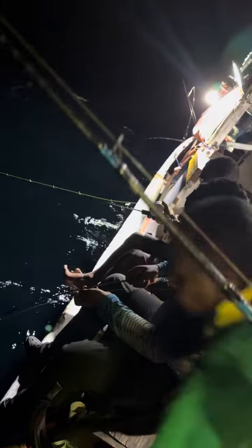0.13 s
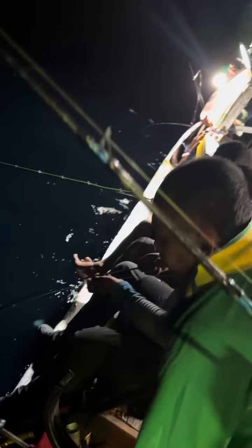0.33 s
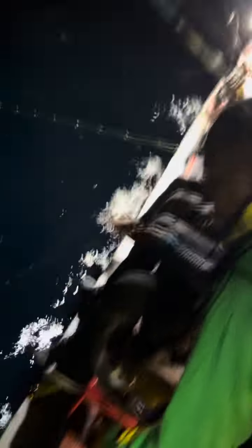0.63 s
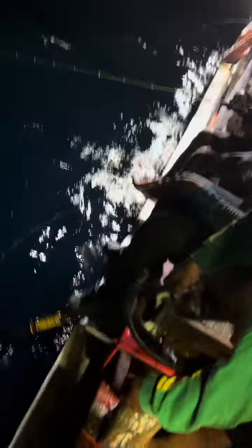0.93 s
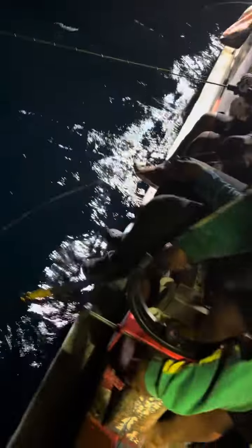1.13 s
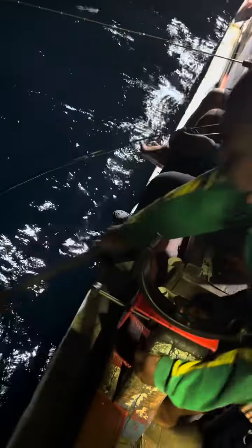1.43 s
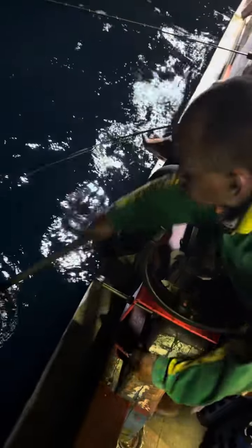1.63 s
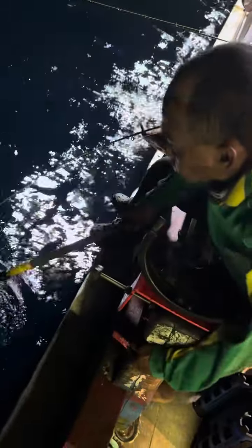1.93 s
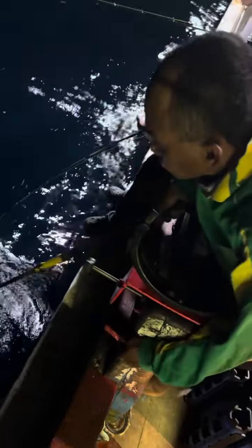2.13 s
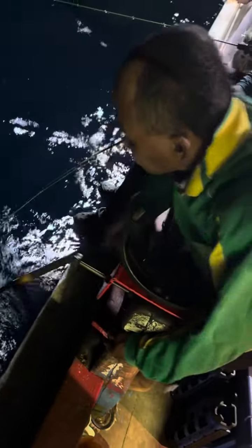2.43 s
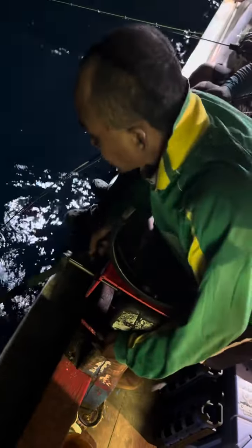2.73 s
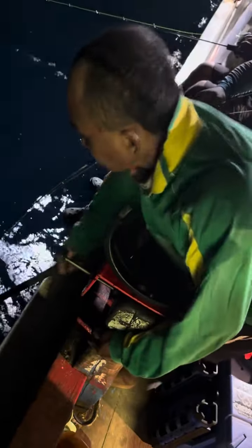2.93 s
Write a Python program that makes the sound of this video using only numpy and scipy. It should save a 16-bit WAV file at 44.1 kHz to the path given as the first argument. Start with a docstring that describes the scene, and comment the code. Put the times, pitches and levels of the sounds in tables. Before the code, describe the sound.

A small boat engine drones low and steadily outdoors on the water, with a slower putting engine beneath. Wind bumps the microphone early, a dull hull thump lands, then faint reel ticks and small gear knocks follow.

```python
"""Small boat idling in a breeze

A small boat's engine hums in shaft orders (tones at multiples of the shaft speed) over noise shaped into
rumble, body sound and hiss. Random crackles make spray, and a slower second engine putts through its pipe.
Breeze gusts push a stereo microphone's two ports in opposite directions. Damped tones thump the hull,
noise snaps make a reel ratchet tick, and short noise bursts make gear scrape and knock.
"""
import sys
import numpy as np
from scipy import signal
from scipy.fft import rfft, irfft, next_fast_len
from scipy.io import wavfile
from scipy.ndimage import uniform_filter1d, map_coordinates

SR = 44100
rng = np.random.default_rng(int(sys.argv[2]) if len(sys.argv) > 2 else 0)


def boost(x):
    """Linear amplitude factor 10**(x/20) for a level x in decibels (scalar or array-like)."""
    u = np.asarray(x, float) / 20
    return 10 ** u


def transcribe(u):
    """Save the signal u as a 16-bit wav file named by the first command-line argument.

    u: samples, shape (n,) or (channels, n), limited to [-1, 1]; the rate is SR.
    q: integer samples, one column per channel.
    """
    v = np.clip(np.atleast_2d(u).T, -1, 1)
    q = np.round(v * 32767).astype(np.int16)
    wavfile.write(sys.argv[1], SR, q)


N = 136710  # length in samples

# Shaft speed over time: time_s, turns_hz
SHAFT_SPEED = [(0, 18.58), (1.3, 18.59), (1.6, 18.65), (2.1, 18.67), (2.8, 18.67), (3.1, 18.65)]
# Strength of each shaft order, relative to the others (the fifth takes its level from
# FIFTH_ORDER_LEVEL): multiple_of_shaft_speed, level_db
SHAFT_ORDERS = [(5, -3), (6, -11.5), (7, 1), (8, -12), (9, -24.5), (10, -16.5), (11, -18), (12, -12),
                (13, -14), (14, -15), (15, -27.5), (17, -24.5), (18, -17), (19, -24.5), (20, -33.5),
                (21, -23.5), (22, -26.5), (23, -33), (24, -29.5), (27, -36.5), (28, -39.5), (29, -30),
                (31, -35), (33, -34), (34, -28.5), (35, -30), (37, -32.5), (38, -40), (39, -32.5),
                (44, -32), (59, -43), (61, -43.5), (62, -37), (63, -40.5), (66, -38.5), (67, -36.5),
                (73, -35.5), (75, -36.5)]
# Level of the tone near 93 Hz, which swells and sinks as two engines' close tones beat;
# the curve stands in for the beating: time_s, level_db
FIFTH_ORDER_LEVEL = [(0, -30), (.25, -20.5), (.45, -33), (.62, -22), (.9, -19.5), (1.2, -23), (1.4, -32),
                     (1.6, -34), (1.8, -26), (2.1, -18), (2.4, -26), (2.6, -26), (2.8, -25), (3.1, -33)]
# Colour of the exhaust rumble: pitch_hz, level_db (per Hz)
RUMBLE_COLOUR = [(20, -36.5), (32, -13), (50, 3), (58, 0), (67, 3), (78, 2), (95, -4.5), (120, -2),
                 (150, -6.5), (170, -10.5), (250, -22.5), (400, -24), (600, -70)]
# Rise and fall of the rumble, before a fixed trim: time_s, level_db
RUMBLE_LEVEL = [(0, -20.5), (.12, -22), (.22, -20.5), (.38, -27.5), (.46, -19), (.55, -21.5), (.7, -34),
                (1.05, -22.5), (1.2, -27), (1.35, -23), (1.7, -24.5), (1.95, -22), (2.1, -26), (2.25, -22),
                (2.36, -27), (2.45, -19.5), (2.55, -22.5), (2.9, -26.5), (3.1, -25)]
# Colour of the engine body noise: pitch_hz, level_db (per Hz)
BODY_COLOUR = [(100, -25), (200, 0.5), (400, -5.5), (550, -7), (900, -11.5), (1350, -15), (1600, -19),
               (2600, -20), (3200, -26.5), (5000, -34.5), (7000, -70)]
# Rise and fall of the body noise, before a fixed trim: time_s, level_db
BODY_LEVEL = [(0.0, -35), (0.47, -37), (0.82, -36.5), (1.4, -36.5), (1.93, -35), (2.09, -37), (2.68, -36.5),
              (3.1, -36.5)]
# Colour of the engine and water hiss: pitch_hz, level_db (per Hz)
HISS_COLOUR = [(2000, -15), (3500, 1.5), (5000, -4), (6200, 0.5), (7500, -1), (9500, -1.5), (11000, -10),
               (13000, -2.5), (15500, -8), (15850, -14.5), (15900, -84)]
# Rise and fall of the hiss, before a fixed trim; spray follows it too: time_s, level_db
HISS_LEVEL = [(0, -47.5), (.6, -47.5), (.9, -48), (1.15, -48), (1.25, -44), (1.36, -46.5), (1.58, -47),
              (1.71, -45), (1.8, -45.5), (1.9, -42.5), (2.03, -44.5), (2.1, -46.5), (2.3, -46.5),
              (2.5, -47.5), (3.1, -46.5)]
# Likeness of left and right, apart from their phase: pitch_hz, likeness (1 = the same)
STEREO_LIKENESS = [(60, .998), (380, .99), (560, .6), (1050, .62), (1500, .9), (1950, .995), (2300, .9),
                   (2900, .5), (4800, .45), (5700, .93), (8500, .76), (10000, .88), (10500, .999),
                   (13600, .999), (14200, .97), (15500, .9)]
# Phase lead of left over right; from 10.4 to 13.6 kHz the two are opposite: pitch_hz, lead_rad
STEREO_PHASE = [(0, 0), (300, 0), (600, -.25), (1100, .45), (1700, 0), (2200, 0), (2900, .8), (4200, -.45),
                (5000, .1), (5700, -.2), (7500, -1.4), (9500, -2.2), (10400, -np.pi), (13600, -np.pi),
                (14300, -3.6), (15500, -4)]
# Level of the whirr: time_s, level_db
WHIRR_LEVEL = [(0, -42), (.3, -40), (.6, -50.5), (1.5, -56), (3.1, -52.5)]
# Resonances of the reel's body: pitch_hz, width_hz, level_db
REEL_BODY = [(4770, 2400, -2.5), (5830, 1600, 4.5), (6770, 900, 4), (9330, 2000, -3)]
# Breeze gusts on the ports: start_s, length_s, level_db
GUSTS = [(0.034, 0.081, -22), (0.123, .1, -18), (0.251, 0.077, -23.5), (.34, 0.26, -29),
         (0.639, 0.056, -22.5), (.72, 0.13, -27), (0.831, 0.093, -24), (0.947, 0.057, -27.5),
         (1.014, 0.049, -21.5), (1.088, 0.193, -36), (1.423, .1, -39), (2.15, 0.17, -47.5),
         (2.424, 0.097, -43), (3.03, .07, -40)]
# Colour of the breeze: pitch_hz, level_db (per Hz)
BREEZE_COLOUR = [(20, -22), (50, 2), (120, 2), (200, 2), (400, -6.5), (800, -24), (1500, -55)]
# Resonances of the second engine's exhaust pipe: pitch_hz, width_hz, level_db
EXHAUST_PIPE = [(50, 12, -3), (68, 8, 0), (98, 14, -2)]
# Dull thumps on the hull: start_s, level_db (before the soft start), pitch_hz, fade_60db_s
HULL_THUMPS = [(.564, -11, 160, 0.045), (.568, -10.5, 352, 0.045), (.570, -14, 435, .035),
               (.572, -15, 600, 0.03), (.574, -11, 250, 0.04), (.586, -13, 210, .04),
               (.582, -9.5, 328, .045), (.583, -13, 480, .035), (.5955, 3, 95, .04), (.614, -17, 330, .04),
               (.895, -20, 360, .04), (1.043, -18, 400, .035)]
# Ratchet ticks: start_s, level_db
RATCHET_TICKS = [(.940, -31.5), (.955, -34.5), (.978, -33.5), (1.009, -34), (1.038, -36.5), (1.052, -39.5),
                 (1.102, -36), (1.127, -35), (1.155, -33.5), (1.178, -38.5), (1.191, -38), (1.211, -33),
                 (1.236, -33.5), (1.245, -33.5), (1.256, -35), (1.270, -33.5), (1.291, -35.5), (1.331, -33),
                 (1.391, -32.5), (1.423, -34), (1.449, -35), (1.520, -35), (1.5989, -28), (1.819, -38),
                 (1.849, -39.5), (1.886, -34), (1.948, -35.5), (1.99, -35), (2.003, -32), (2.026, -35),
                 (2.075, -35), (2.083, -35), (2.19, -35), (2.216, -35), (2.245, -36), (2.28, -35),
                 (2.41, -37), (2.542, -37), (2.646, -36), (2.962, -35), (3.018, -36), (3.078, -34)]
# Scrapes and knocks of gear: start_s, length_s (before fading), level_db, pitch_hz, width_hz
GEAR_KNOCKS = [(1.52, 0.014, -38.5, 3000, 1500), (1.745, 0.012, -30, 1150, 500),
               (1.751, .01, -33, 2100, 900), (1.753, 0.011, -24, 904, 110),
               (1.815, 0.0061, -35, 2600, 1530), (1.888, 0.019, -31.5, 1010, 490),
               (1.893, .006, -31, 2150, 400), (1.894, .005, -31, 2750, 500), (1.904, .007, -32, 2150, 300),
               (1.903, 0.008, -30, 2710, 250), (1.907, 0.004, -34.5, 4800, 1800),
               (1.971, 0.0084, -35.5, 2850, 900), (1.993, 0.0058, -27.5, 900, 890),
               (1.924, 0.056, -39, 1500, 1200), (2.004, 0.012, -35, 2000, 900),
               (2.014, .014, -35, 2600, 500), (2.192, 0.0044, -34, 12900, 7000)]

# The slower second engine, which also sets the rhythm of the rumble
PUTTS_PER_S, PUTT_START_S = 8.56, .074


def unit(x):
    """Scale to an average (rms) level of 1."""
    return x / np.sqrt(np.mean(x ** 2) + 1e-20)


def along(points, hz):
    """Read a pitch table between its points, on a log pitch axis."""
    table_hz, value = np.transpose(points)
    return np.interp(np.log(hz + 1), np.log(table_hz + 1), value)


def curve(rows):
    """Read a time table between its points, one value per sample."""
    return np.interp(np.arange(N) / SR, *np.transpose(rows))


def wobble(rate):
    """A smooth random curve through `rate` random points a second."""
    points = rng.standard_normal(int(N * rate / SR) + 4)
    return map_coordinates(points, [np.arange(N) * rate / SR])


def filtered(x, response):
    """Multiply the spectrum of x by a response that depends on pitch."""
    m = next_fast_len(x.shape[-1] + 8192)
    spectrum = rfft(x, m) * response(np.fft.rfftfreq(m, 1 / SR))
    return irfft(spectrum, m)[..., :x.shape[-1]]


def resonant(x, peaks):
    """Ring x in a set of resonances, added with alternating signs."""
    def response(f):
        total = 0
        for k, (centre, width, db) in enumerate(peaks):
            ring = 1j * f * width / (centre * centre - f * f + 1j * f * width)
            total = total + (-1) ** k * boost(db) * ring
        return total
    return filtered(x, response)


def noise(colour, patchy_db):
    """Two unrelated coloured noises that share patches of random gain in time and pitch."""
    z = signal.stft(rng.standard_normal((2, N)), nperseg=512)[2]
    patches = rng.standard_normal(z.shape[1:])
    for axis in (0, 1):
        patches = uniform_filter1d(patches, size=8, axis=axis)
    pair = signal.istft(z * boost(patchy_db * unit(patches)), nperseg=512)[1][:, :N]
    return unit(filtered(pair, lambda hz: boost(along(colour, hz))))


def place(out, sound, start_s):
    """Add a short sound to a longer one at its start time."""
    i = round(start_s * SR)
    out[..., i:i + sound.shape[-1]] += sound


def ports(pair):
    """A direct and a scattered sound mix into left and right, partly alike and out of phase."""
    def share(hz):
        # this angle makes a + b and a - b as alike as the table says
        angle = np.arccos(np.clip(along(STEREO_LIKENESS, hz), 0, 1)) / 2
        return np.array([np.cos(angle), np.sin(angle)])
    a, b = filtered(pair, share)
    # half of the phase lead goes to each side
    lead = lambda hz: np.exp(.5j * np.outer([1, -1], along(STEREO_PHASE, hz)))
    return filtered(np.array([a + b, a - b]), lead)


def shaft_hum(turn):
    """Each shaft order is a slightly unsteady tone at a multiple of the shaft's turning."""
    strongest_db = -20.8
    sweep_rad, sweep_order = .5, 13.8  # phase bend per order squared; order with no delay
    shared_waver_rad, own_waver_rad = .02, .15
    top = max(db for _, db in SHAFT_ORDERS)
    hum, waver = np.zeros((2, N)), shared_waver_rad * wobble(4)
    for k, db in SHAFT_ORDERS:
        level_db = curve(FIFTH_ORDER_LEVEL) if round(k) == 5 else strongest_db + db - top
        unsteady_db = 1 if round(k) < 9 else 2.5
        # the bend makes each turn's pulse sweep downward
        phase = k * (turn + waver) + sweep_rad * (k - sweep_order) ** 2 + own_waver_rad * wobble(6.16)
        # the scattered copy has a random fixed phase
        phase = phase + [[0], [rng.uniform(0, 2 * np.pi)]]
        hum += np.sqrt(2) * boost(level_db + unsteady_db * wobble(5)) * np.sin(phase)
    return hum


def exhaust_rumble():
    """Low noise that swells just after each putt."""
    swell_depth, lag_s = .4, .03
    since_putt_s = np.arange(N) / SR - PUTT_START_S - lag_s
    swell = 1 + swell_depth * np.cos(2 * np.pi * PUTTS_PER_S * since_putt_s + .4 * wobble(3))
    level = boost(curve(RUMBLE_LEVEL) - 1.2 + 1.2 * wobble(21.95))
    return level * swell * noise(RUMBLE_COLOUR, patchy_db=-0.56)


def body_noise(turn):
    """Engine noise that pulses once and twice per shaft turn."""
    firing_depth = .12  # twice per turn; half as deep once per turn
    gate = 1 + firing_depth * np.cos(2 * turn) + firing_depth / 2 * np.cos(turn)
    return boost(curve(BODY_LEVEL) + 4.0) * gate * noise(BODY_COLOUR, patchy_db=1.5)


def hiss():
    """Engine and water hiss: high noise with a flickering level."""
    return boost(curve(HISS_LEVEL) + 3.0 + 0.37 * wobble(20)) * noise(HISS_COLOUR, patchy_db=1.84)


def engine():
    """The turning shaft drives the hum and body noise; rumble and hiss join them."""
    turn = 2 * np.pi * np.cumsum(curve(SHAFT_SPEED)) / SR  # shaft angle in radians
    return shaft_hum(turn) + exhaust_rumble() + body_noise(turn) + hiss()


def whirr():
    """A narrow band of noise near 1200 Hz, strongest in the first half second."""
    peak = [(1200, 250, 0)]  # pitch_hz, width_hz, level_db
    band = resonant(resonant(rng.standard_normal((2, N)), peak), peak)
    return boost(curve(WHIRR_LEVEL)) * unit(band)


def spray():
    """Tiny random crackles, louder when the hiss swells."""
    hits_per_s, fade_60db_s = 300, .01
    gain_db, growth = -42, 1.8  # growth: dB for each dB of hiss
    swell_db = curve(HISS_LEVEL)
    strength = boost(np.clip(3.5 * rng.standard_normal((2, N)), -8, 7))
    hits = (rng.random((2, N)) < hits_per_s / SR) * strength
    t = np.arange(SR // 50) / SR
    fades = signal.fftconvolve(hits, boost(-60 * t / fade_60db_s)[None], axes=1)[:, :N]
    crackle = fades * rng.standard_normal((2, N))
    level = boost(gain_db + growth * (swell_db - swell_db.mean()))
    return level * resonant(crackle, REEL_BODY + [(3000, 3400, -6.5)])


def breeze():
    """Lumpy gusts of low noise push the two ports in opposite directions."""
    edge_s, lumps_db = .012, -0.5
    t = np.arange(N) / SR
    level = np.zeros(N)
    for start, length, db in GUSTS:
        inside_s = np.minimum(t - start, start + length - t)  # time from the nearer edge
        level += boost(db) * np.clip(inside_s / edge_s + .5, 0, 1)
    push = unit(boost(lumps_db * wobble(44.97)) * noise(BREEZE_COLOUR, patchy_db=1.8)[0])
    return level * push * [[1], [-1]]


def putts():
    """A slower second engine: slightly uneven blows ring in its exhaust pipe."""
    level_db, scatter_db, jitter_s = -26.5, 2, .002
    times = PUTT_START_S + np.arange(int(N / SR * PUTTS_PER_S)) / PUTTS_PER_S
    late, strong = rng.standard_normal((2, len(times)))
    blows = np.zeros((2, N))
    blows[0, np.round((times + jitter_s * late) * SR).astype(int)] = boost(scatter_db * strong)
    return boost(level_db) * unit(resonant(resonant(blows, EXHAUST_PIPE), [(75, 60, 0)]))


def thumps():
    """Damped swings of the hull: fading tones with a soft start, in the direct sound only."""
    t, out = np.arange(SR // 10) / SR, np.zeros((2, N))
    for start, db, hz, fade_s in HULL_THUMPS:
        soft_start = 1 - np.exp(-t / 0.0025)
        place(out[0], boost(db - 60 * t / fade_s) * np.sin(2 * np.pi * hz * t) * soft_start, start)
    return out


def ratchet():
    """Short noise snaps ring in the reel's body."""
    t, out = np.arange(SR // 10) / SR, np.zeros((2, N + SR))
    fade = boost(-60 * t / .032)  # falls 60 dB in .032 s
    for start, db in RATCHET_TICKS:
        snap = unit(resonant(fade * rng.standard_normal((2, len(t))), REEL_BODY))
        place(out, boost(db) * snap * np.sqrt(np.mean(fade ** 2)), start)
    return out[:, :N]


def gear():
    """Each scrape or knock is a short noise burst through two resonances at one pitch."""
    t, out = np.arange(SR // 10) / SR, np.zeros((2, N))
    for start, length, db, hz, width in GEAR_KNOCKS:
        rise = np.clip(t / (0.15 * length), 0, 1)
        fade = boost(-60 * np.clip(t - length, 0, 1) / (1.14 * length))
        burst = resonant(rise * fade * rng.standard_normal((2, len(t))), [(hz, width, 0)])
        burst = resonant(burst, [(hz, 2 * width, 0)])
        # a longer burst carries more energy
        place(out, boost(db) * unit(burst) * np.sqrt(length / t[-1]), start)
    return out


def scene():
    """Airborne sounds spread into left and right, plus the breeze on the ports."""
    air = engine() + whirr() + spray() + putts() + thumps() + ratchet() + gear()
    return ports(air) + breeze()


def roll_off(x):
    """The treble ends steeply here."""
    return signal.sosfilt(signal.butter(12, 16730, fs=SR, output="sos"), x)


def record(dry):
    """A wind suppressor lowers the shared low mids while the ports differ strongly."""
    low_hz, high_hz = 278, 1040
    threshold_db, ratio, window_s = -29, 1.7, 0.077  # ratio: dB of cut for each dB over the threshold
    mid, side = dry.sum(axis=0) / 2, (dry[0] - dry[1]) / 2
    side_power = np.abs(uniform_filter1d(side ** 2, size=int(window_s * SR)))
    side_db = 10 * np.log10(side_power + 1e-9)
    band = filtered(mid, lambda hz: 1 / (1 + (low_hz / (hz + 1)) ** 4) / (1 + (hz / high_hz) ** 4))
    cut_db = ratio * np.clip(side_db - threshold_db, 0, 30)
    mid = mid - band * (1 - boost(-cut_db))
    return roll_off(np.array([mid + side, mid - side]))


dry = scene()
out = record(dry)
transcribe(out)
```